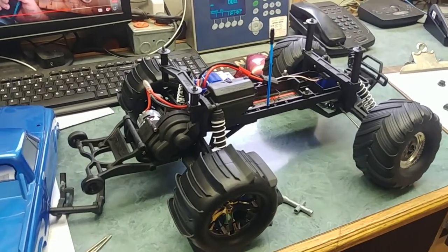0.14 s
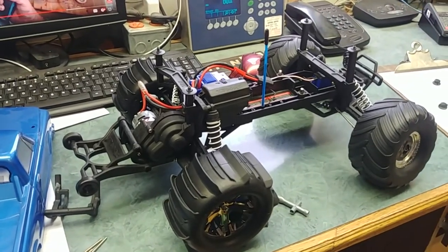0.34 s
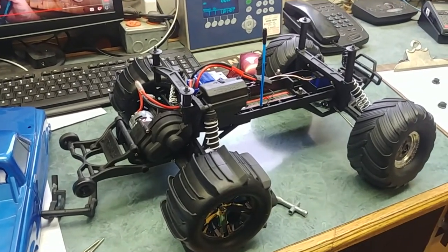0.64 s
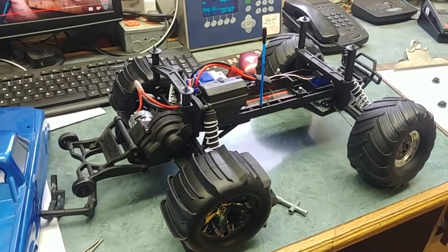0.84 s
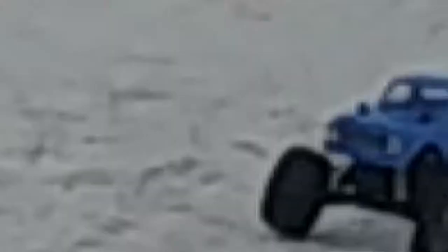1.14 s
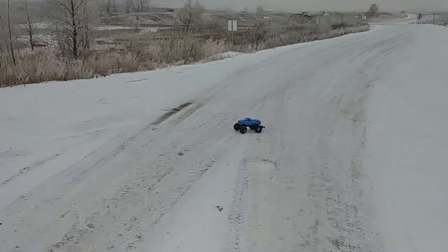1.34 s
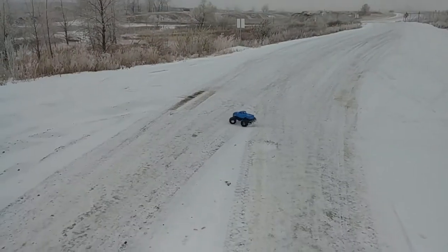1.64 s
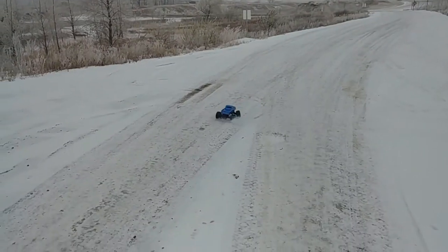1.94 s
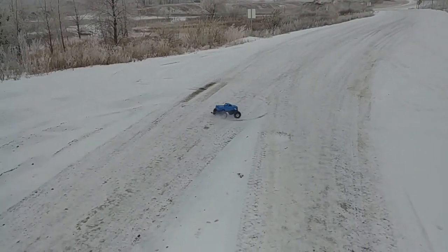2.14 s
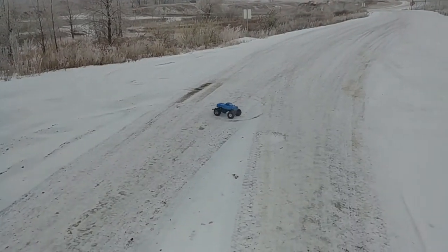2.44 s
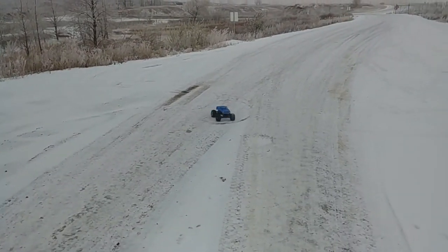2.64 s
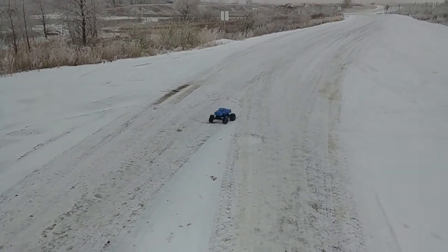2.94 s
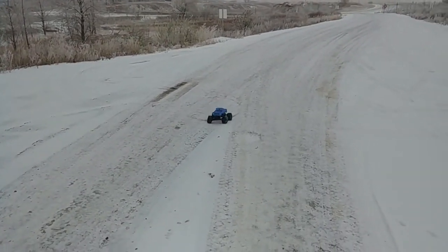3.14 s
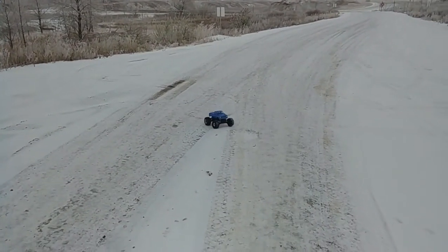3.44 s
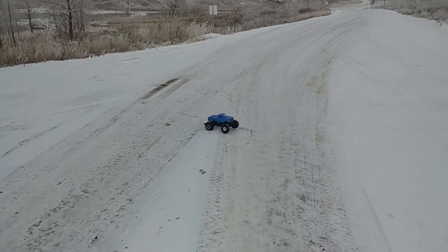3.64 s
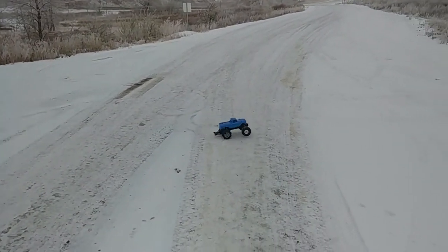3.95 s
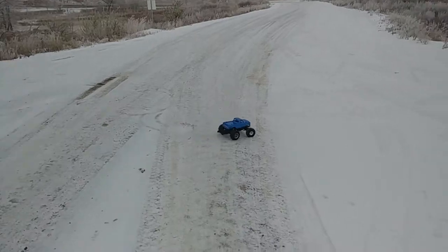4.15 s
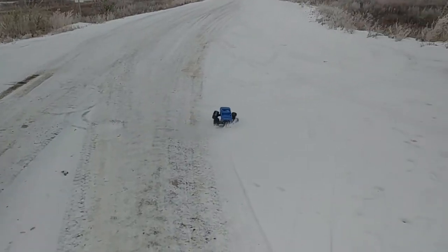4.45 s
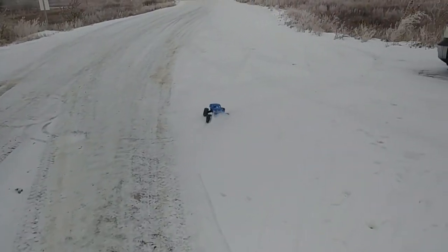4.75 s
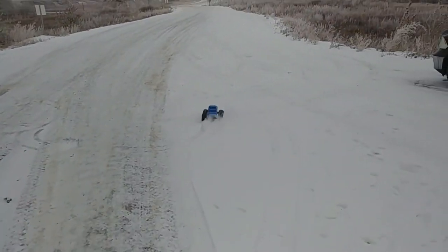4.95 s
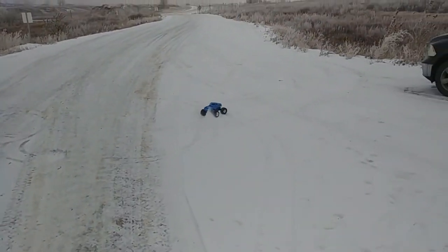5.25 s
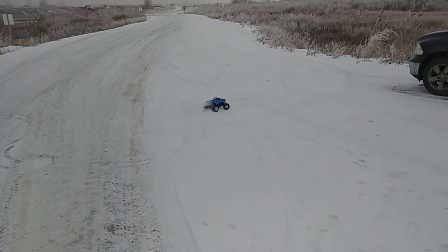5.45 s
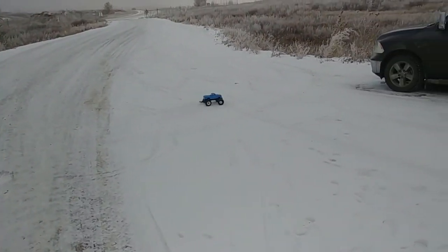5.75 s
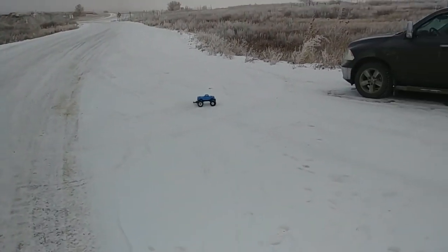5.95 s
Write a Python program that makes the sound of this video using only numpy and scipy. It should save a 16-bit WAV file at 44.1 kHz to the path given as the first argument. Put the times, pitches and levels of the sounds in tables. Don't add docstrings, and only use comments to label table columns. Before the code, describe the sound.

A nearly silent workshop: low room tone, a faint beating appliance hum, small scratchy handling ticks at the start. After a tiny dead silence it cuts outdoors, where a toy truck's electric gears whine up and down in quick throttle bursts, tyres crunching and hissing through snow, clods and grit tapping its plastic shell. Light wind buffets a handheld phone microphone, and a car idles low.

```python
import sys
import numpy as np
from scipy import signal
from scipy.fft import rfft, irfft, next_fast_len
from scipy.io import wavfile

SR = 44100
rng = np.random.default_rng(int(sys.argv[2]) if len(sys.argv) > 2 else 0)


def generate_wav(sig):
    pcm = np.round(np.clip(np.atleast_2d(sig).T, -1, 1) * 32767).astype(np.int16)
    wavfile.write(sys.argv[1], SR, pcm)


def gain_from_decibels(decibels):
    exponent = np.asarray(decibels, float) / 20
    return 10 ** exponent


N = 268172
WORKSHOP_END_S, ROAD_START_S = 0.889, 0.97


def rms_one(x):
    return x / np.sqrt(np.mean(x ** 2) + 1e-20)


def in_time(rows):
    s, *columns = np.transpose(rows)
    return [np.interp(np.arange(N) / SR, s, column) for column in columns]


def at_hz(points, hz):
    table_hz, value = np.transpose(points)
    return np.interp(np.log(hz), np.log(table_hz), value)


def drift(rate):
    step, settle = 20, 4000
    pole = np.exp(-2 * np.pi * rate * step / SR)
    noise = rng.standard_normal(N // step + settle + 2)
    slow = rms_one(signal.lfilter([1], [1, -2 * pole, pole * pole], noise)[settle:])
    return np.interp(np.arange(N) / step, np.arange(len(slow)), slow)


def shaped(x, gain_at):
    size = next_fast_len(N + 4096)
    hz = np.maximum(np.arange(size // 2 + 1) * SR / size, 1)
    return irfft(rfft(x, size) * gain_at(hz), size)[..., :N]


def band(x, low, high):
    return signal.sosfilt(signal.butter(4, [low, high], "band", fs=SR, output="sos"), x)


def bump(at, width):
    return np.exp(-.5 * ((np.arange(N) / SR - at) / width) ** 2)


def spell(start, length, edge_s=0.012):
    t = np.arange(N) / SR
    return np.clip(np.minimum(t - start, start + length - t) / edge_s + .5, 0, 1)


# (frequency [Hz], level [dB])
PORT_SHADOW = [(60, 7.5), (200, 4.5), (380, 10), (700, 5.5), (1290, 4.5), (2380, 9), (4400, 16), (8120, 13),
               (15000, 40.5)]
# (frequency [Hz], coherence [0-1])
COHERENCE = [(100, .9), (500, .97), (1000, .8), (3000, .72), (8000, .62), (15000, .3)]
# (frequency [Hz], delay [samples])
PORT_LAG = [(200, 0.5), (600, 8.7), (1300, 7), (3000, 11.95)]


def ports(direct, diffuse):
    alike = lambda hz: np.clip(at_hz(COHERENCE, hz), 0, 1)
    shadow = lambda hz: gain_from_decibels(-at_hz(PORT_SHADOW, hz))
    late = lambda hz: np.exp(-2j * np.pi * hz * at_hz(PORT_LAG, hz) / SR)
    right = shaped(direct, lambda hz: shadow(hz) * alike(hz) * late(hz))
    right += shaped(diffuse, lambda hz: shadow(hz) * np.sqrt(1 - alike(hz) ** 2))
    return 1.571 * np.array([direct, right])


# (frequency [Hz], level [dB per Hz])
ROOM_TONE = [(30, -14), (69, -14), (171, -16), (193, -33), (239, -4), (270, -23.5), (334, -13),
             (445, -24.5), (770, -28.5), (828, -18.5), (889, -32), (2000, -35.5), (4500, -42),
             (16000, -45.5)]
# (frequency [Hz], level [dB])
APPLIANCE_HUM = [(231, -64), (239, -94), (329, -67.5)]
# (time [s], peak level [dB], centre frequency [Hz], decay [s], relative half width [ratio])
RUSTLE = [
    (0.0008, -39.5, 3400, 0.017, 0.12),
    (0.03, -41, 3500, 0.0022, 0.19),
    (0.047, -42, 2700, 0.0032, 0.29),
    (0.033, -54, 7500, 0.0018, .1),
    (.062, -53, 6500, .002, .35),
    (.043, -45, 3300, .002, .15),
    (.0005, -52, 4600, 0.0095, 0.57),
    (0.36, -70, 5300, 0.013, .3),
    (0.34, -72.5, 5000, 0.0033, .3),
]


def workshop():
    t = np.arange(N) / SR
    room = shaped(rng.standard_normal((2, N)), lambda hz: gain_from_decibels(at_hz(ROOM_TONE, hz)))
    tone = gain_from_decibels(-58 + .5 * drift(23)) * rms_one(room)
    for hz, db in APPLIANCE_HUM:
        tone[0] += gain_from_decibels(db + 3.5 + 2.0 * drift(13.0)) * np.sin(2 * np.pi * hz * t)
    for s, db, hz, decay, half in RUSTLE:
        fading = (t >= s) * np.exp(-np.maximum(t - s, 0) / decay)
        rub = rng.standard_normal((2, N)) * fading
        tone += gain_from_decibels(db + 5.5) * band(rub, (1 - half) * hz, (1 + half) * hz)
    return ports(*tone)


# (time [s], level [dB])
IDLE_LEVEL = [
    (0.97, -51),
    (1.17, -32),
    (1.9, -32),
    (3.25, -34),
    (3.8, -31),
    (4.3, -29.5),
    (4.9, -39),
    (5.1, -35),
    (6.08, -37.5),
]
# (frequency [Hz], level [dB])
ENGINE_ORDERS = [(45.5, -42.5), (91, -5), (136.5, -2), (182, -14), (227.5, -18), (273, -14)]


def idling_car():
    cycle = np.cumsum(1 + 0.00543 * drift(1.94)) / SR
    tones = 0
    for hz, db in ENGINE_ORDERS:
        tones = tones + gain_from_decibels(db + 3.9 * drift(29.0)) * np.sin(2 * np.pi * hz * cycle + 6 * rng.random())
    return gain_from_decibels(in_time(IDLE_LEVEL)[0] + 1.0) * tones


# (frequency [Hz], level [dB per Hz])
OPEN_AIR = [(24, -39), (40, -9), (75, -1), (140, -3.5), (215, -9), (585, -26.5), (1440, -33), (3300, -65),
            (4570, -48), (7930, -49), (8770, -88.5), (13400, -103.5), (16000, -63.5)]


def open_air():
    t = np.arange(N) / SR
    air = shaped(rng.standard_normal((2, N)), lambda hz: gain_from_decibels(at_hz(OPEN_AIR, hz)) * (hz > 150))
    return gain_from_decibels(-45) * rms_one(air) * np.clip((t - ROAD_START_S) / 0.19, .1, 1)


# (time [s], peak level [dB], left minus right [dB])
GUSTS = [(1.21, -27, 10), (1.45, -21.5, 19), (1.841, -25.5, -18), (2.04, -35, 22), (2.6, -40, 4),
         (2.98, -23, -1), (3.3, -26, -6), (3.45, -29.5, -19), (4.04, -26, -17), (4.26, -26, 1),
         (4.49, -43, 13), (4.851, -46, -1), (5.0, -25, -3), (5.4, -30, 24)]


def wind():
    gust_s, breeze_db, breeze_pan_db = 0.034, -30, 0.5
    side = np.array([[.5], [-.5]])
    rise = np.clip((np.arange(N) / SR - ROAD_START_S) / 0.37, .1, 1)
    power = gain_from_decibels(breeze_db + breeze_pan_db * side) ** 2 * rise
    for s, db, pan_db in GUSTS:
        power = power + (gain_from_decibels(db + pan_db * side) * bump(s, gust_s)) ** 2
    lumps = gain_from_decibels(1.9 * np.array([drift(11), drift(37)]))
    turbulence = band(rng.standard_normal((2, N)) * lumps, 55.1, 115.3)
    return gain_from_decibels(-5.5) * np.sqrt(power) * rms_one(turbulence)


# (time [s], tooth mesh frequency [Hz], response time [s], whine level [dB])
TRIGGER = [(0.97, 3957, 0.035, -44.5), (1.275, 1946, 0.095, -47.5), (1.484, 3950, 0.049, -36.5),
           (1.6, 3954, 0.047, -41), (1.745, 3135, 0.042, -38.5), (1.915, 2014, 0.037, -59),
           (2.012, 2350, .02, -43.5), (2.035, 3950, 0.056, -42), (2.13, 3911, 0.047, -52),
           (2.3, 2568, 0.072, -45.5), (2.43, 2132, 0.016, -43), (2.487, 1860, 0.014, -60.5),
           (2.62, 2162, 0.043, -66), (2.7, 1655, 0.0091, -47.5), (2.76, 1184, 0.038, -45.5),
           (2.985, 1100, 0.033, -53), (3.205, 5020, 0.19, -43), (3.345, 3233, .03, -40.5),
           (3.42, 3580, 0.023, -32), (3.455, 3076, 0.047, -38.5), (3.525, 1706, 0.06, -48),
           (3.575, 1802, .07, -43), (3.7, 2013, .025, -59), (3.74, 2050, 0.025, -55),
           (3.757, 4587, 0.22, -39), (3.885, 3265, 0.027, -39.5), (3.915, 2660, 0.013, -37.5),
           (3.95, 2928, 0.028, -39.5), (4.07, 3390, 0.02, -46), (4.3, 3192, .03, -36.5),
           (4.37, 2800, 0.02, -32.5), (4.405, 2860, 0.017, -42), (4.475, 2003, 0.096, -49.5),
           (4.625, 1577, 0.015, -59), (4.73, 3102, 0.032, -36.5), (4.885, 3260, 0.012, -38),
           (5.025, 2770, .04, -40), (5.225, 2540, 0.028, -42.5), (5.39, 2325, 0.033, -43),
           (5.475, 2077, 0.017, -53.5), (5.51, 2065, .03, -58.5), (5.6, 1743, 0.021, -58.5),
           (5.66, 1651, 0.068, -74), (5.8, 1615, 0.024, -66.5), (5.99, 1507, 0.026, -67.5)]


def throttle():
    whine_settle_s = 0.012
    t = np.arange(N) / SR
    hz, db = np.full(N, float(TRIGGER[0][1])), np.full(N, float(TRIGGER[0][3]))
    for s, goal_hz, response, goal_db in TRIGGER:
        at = round(s * SR)
        hz[at:] = goal_hz + (hz[at] - goal_hz) * np.exp(-(t[at:] - s) / response)
        db[at:] = goal_db + (db[at] - goal_db) * np.exp(-(t[at:] - s) / whine_settle_s)
    return hz, db


# (start [s], length [s], loss [dB], overspeed [Hz])
SLACK = [(0.96, 0.0567, 18, 50.4), (1.05, .045, 14, 60), (1.116, .025, 6, 61.1), (1.256, 0.02603, 13, 150),
         (1.32, .04, 6, 0.43), (1.398, 0.079, 19, 0.88), (1.531, 0.02, 12, 0.45), (1.562, 0.071, 9.5, 2.2),
         (1.719, 0.011, 8, 40.8), (1.732, 0.019, 5, 1), (1.799, 0.05, 9, 220), (1.898, 0.04, 12, 2),
         (2.11, 0.071, -1, 1.3), (2.322, 0.092, 6, 1.1), (2.545, 0.049, 14, 0.91), (2.682, 0.02, 21, 0.89),
         (2.731, 0.04556, 6, 80), (2.843, 0.01457, 1, 200), (2.897, .012, -1, 150),
         (2.943, 0.01962, 6, 170), (3.058, 0.1086, 15.5, 60), (3.219, 0.068, 10.5, 0.84),
         (3.314, 0.025, 2, 0.79), (3.407, .045, 12, 0.88), (3.514, 0.083, 11, 0.68),
         (3.62, 0.091, 21.5, 1.4), (3.828, 0.045, 8, 55), (3.917, 0.014, 5, 1.1), (4.05, 0.031, 31, 1.7),
         (4.163, 0.18, 6, 1.4), (4.32, .042, 12, 1), (4.469, 0.0907, -1, 49.7), (4.609, 0.018, 4, 1.1),
         (4.727, 0.053, 5, 1.2), (4.795, 0.04, 6, 1.3), (4.84, 0.02, 8, 1.1), (4.954, 0.015, 6, 0.79),
         (5.088, 0.0257, 5, 220), (5.149, 0.08, 8, 180), (5.261, 0.036, 6, 39), (5.315, 0.04, 1, 60),
         (5.433, .035, 14, 180), (5.501, .04, 7, 85), (5.565, .03, 10, 70), (5.638, 0.028, 23, 220),
         (5.761, 0.027, 0, 40), (5.838, .15, 23, 110), (6.035, 0.062, 9, 0.97)]


def backlash(hz, db):
    edge_s, overspeed_s = 0.011, 0.034
    t = np.arange(N) / SR
    for s, length, loss_db, extra_hz in SLACK:
        since = t - s - length
        db = db - loss_db * spell(s, length, edge_s)
        speeding = np.clip(1 + since / length, 0, 1)
        sagging = np.exp(-np.abs(since) / overspeed_s)
        hz = hz + extra_hz * np.where(since < 0, speeding, sagging)
    return hz, db


# (time [s], second harmonic over first [dB])
FACING = [(.97, -21), (1.5, -29), (1.585, -9), (1.63, -4), (1.72, -9), (1.76, -3), (1.82, -13), (1.87, -18),
          (1.895, 3.5), (1.925, -15), (2.0, -13), (2.04, 9), (2.065, -13), (2.13, -7), (2.17, 5),
          (2.3, 5.5), (2.42, -47), (2.48, -30), (2.51, 12), (2.73, 8), (2.76, -8), (2.8, -1), (2.83, 0),
          (2.87, -21), (3.15, -17), (3.21, -10), (3.235, 14), (3.28, 4.5), (3.305, -24), (3.38, -8),
          (3.45, -33), (3.51, -6), (3.56, 10), (3.61, -5.5), (3.69, 15.5), (3.74, 19), (3.775, -10),
          (3.9, -35), (4.25, -3), (4.35, -5), (4.4, -20), (4.47, -11.5), (4.5, -24), (4.58, -11),
          (4.62, -11), (4.645, 15), (4.725, 20.5), (4.76, -10), (4.8, -22), (4.82, -5.5), (5.05, -17.5),
          (5.33, -23), (5.41, -7), (5.45, -26), (5.48, -7), (5.6, 6.5), (6.08, 26)]


def second_harmonic(mesh_db, glide_hz):
    loss_db = 10
    glide = np.clip(abs(np.gradient(glide_hz)) * SR / 20000, 0, 1)
    return mesh_db + in_time(FACING)[0] - loss_db * glide


# (frequency [Hz], width [Hz])
SHELL = [(446, 586), (1054, 95), (1831, 110), (2250, 400), (3290, 31), (6250, 870), (7730, 47), (8040, 930)]


def shell_lift(hz):
    return sum(1 / (1 + (2 * (hz - mid) / width) ** 2) for mid, width in SHELL)


TEETH = 25
# (time [s], gain [dB])
FLARES = [(1.64, 19), (2.085, 14.5), (2.98, 11), (3.6, 17), (4.49, 23.5), (4.81, 15), (4.87, 11.5),
          (4.93, 8.5), (4.98, 4), (5.04, 9), (5.17, 12), (5.23, 9), (5.28, 14)]


def gears(turns, hz, mesh_db, second_db):
    wobble = np.cumsum(hz * (.005 * drift(80) + .007 * drift(16))) / SR
    phase = 2 * np.pi * (TEETH * turns + wobble)
    runout = np.sin(2 * np.pi * turns) + .35 * np.sin(6 * np.pi * turns + 1)
    third_db = mesh_db - 6.5 - hz / 170
    third_db = third_db + sum(db * bump(s, 0.032) for s, db in FLARES)
    beat = 1 + 0.057 * np.sin(2 * np.pi * turns + 2.6)
    out = 0
    for k, db in enumerate((mesh_db + 8.5, second_db + 8.5, third_db), 1):
        rattle = rms_one(band(rng.standard_normal(N), 51, 450))
        level = gain_from_decibels(db + 4.2 * np.clip(drift(38), -3, 1))
        out = out + level * (.95 + .5 * rattle / k ** .7) * np.sin(k * phase + .6 * runout)
    return shaped(beat * out, lambda hz: .6 + .5 * shell_lift(hz))


# (time [s], level [dB])
GRIP = [(0.98, -40.5), (1.19, -29), (1.46, -36), (1.58, -27), (2.37, -28.5), (2.43, -32.5), (2.97, -33.5),
        (3.18, -55), (3.25, -30.5), (3.41, -29), (3.72, -42), (3.82, -34), (4.39, -30.5), (4.59, -45),
        (4.96, -50), (5.01, -34.5), (5.18, -50), (6.08, -55)]
# (time [s], level [dB])
EFFORT = [(0.98, -60), (1.05, -49.5), (1.29, -47), (1.45, -60), (1.63, -47.5), (1.92, -38.5), (1.96, -50),
          (2.29, -39.5), (2.36, -53.5), (3.22, -67), (3.35, -46.5), (3.76, -54.5), (4.32, -43.5),
          (4.74, -51), (4.83, -43.5), (5.27, -50), (5.43, -61), (6.08, -65.5)]


def driven(db, grip, effort):
    mean_grip_db, mean_effort_db = -35, -55
    grip_db = grip * (in_time(GRIP)[0] - mean_grip_db)
    return db + grip_db + effort * (in_time(EFFORT)[0] - mean_effort_db)


def shaft(turns, hz):
    level_db = driven(-39, grip=0.87, effort=0.47) + 3 * np.log2(hz / 3500)
    return gain_from_decibels(level_db) * np.sin(2 * np.pi * turns)


# (frequency [Hz], level [dB per Hz])
TRUCK = [(120, -37.5), (200, -3), (360, -10.5), (440, -5), (735, -11), (1040, -13.5), (1590, -18),
         (2250, -21), (3900, -27.5), (5330, -35), (6200, -32), (7830, -29.5), (9000, -33), (10500, -51),
         (13000, -64.5)]


def shell_gain(hz):
    bounce = 1 + .3 * np.cos(2 * np.pi * hz * .0023)
    return bounce * gain_from_decibels(at_hz(TRUCK, hz)) * (0.6 + 1.72 * shell_lift(hz))


def grains(per_s, spread_db):
    born = rng.random(N) < per_s / SR
    size = gain_from_decibels(spread_db * np.minimum(rng.exponential(1, N), 2)) * born
    burst = signal.lfilter([1], [1, -.97], size)
    return rng.standard_normal((2, N)) * (1.27 + burst)


# (start [s], length [s], loss [dB])
WHEELSPIN = [
    (3.054, 0.11, 5.5),
    (4.85, 0.14, 13),
    (4.948, 0.285, 16),
]
# (time [s], gain [dB])
SPURTS = [
    (1.511, 0),
    (1.889, 3.5),
    (1.99, 12),
    (2.081, 9.5),
    (2.36, 7.5),
    (2.71, 7.5),
    (3.49, -1),
    (4.15, 6.5),
    (4.33, 9),
]


def churn(turns, hz):
    free_db = sum(db * spell(s, length) for s, length, db in WHEELSPIN)
    spurt_db = sum(db * bump(s, 0.026) for s, db in SPURTS)
    drum_db = driven(-35.4, grip=1.29, effort=0.013) - 0.15 * free_db
    churn_db = driven(-42, grip=0.67, effort=0.24) - free_db + 0.6 * spurt_db
    gearbox_db = driven(-48, grip=0.12, effort=0.58) + spurt_db
    brush_db = driven(-60.5, grip=.01, effort=1)
    snow = shaped(grains(.15 * hz, 3.2) * gain_from_decibels(0.5 * drift(18)), shell_gain)
    pulse = .5 + .5 * np.sin(2 * np.pi * turns + .8 * drift(30))
    puff = (.5 + pulse ** 2) * gain_from_decibels(1.8 * drift(15))
    hiss = shaped(rng.standard_normal((2, N)) * puff + .5 * grains(1.0 * hz, 0.74), shell_gain)
    out = gain_from_decibels(drum_db) * rms_one(band(snow, 190, 800))
    out += gain_from_decibels(churn_db + 1.16 * drift(38.0)) * rms_one(band(snow, 1075, 3100))
    out += gain_from_decibels(gearbox_db + 2.15 * drift(18.0)) * rms_one(band(hiss, 2614, 5284))
    out += gain_from_decibels(brush_db + 2.0 * drift(17)) * rms_one(band(hiss, 5880, 11000))
    return out


# (start [s], length [s], level [dB])
SPELLS = [(0.979, 0.366, -61.5), (1.514, 0.12, -60), (1.586, 0.18, -47), (1.757, 0.186, -54),
          (2.047, 0.31, -60.5), (2.36, 0.165, -72), (3.201, .15, -70), (3.438, 0.042, -61),
          (3.702, 0.34, -67), (3.996, 0.38, -54.5), (4.363, 0.23, -60), (4.747, 0.35, -61),
          (5.198, 0.18, -66), (5.405, 0.22, -76), (5.633, 0.5, -81.5)]


def sizzle():
    bright = shaped(rng.standard_normal((2, N)), lambda hz: np.clip(hz / 15500, 0, 1) ** 8)
    level = sum(gain_from_decibels(db) * spell(s, length) for s, length, db in SPELLS)
    return level * gain_from_decibels(12.0 + 2.4 * drift(24)) * rms_one(bright)


# (time [s], level [dB])
GRIT = [
    (1.023, -22),
    (1.684, -24),
    (1.903, -8.5),
    (1.908, -16),
    (3.18, -47),
    (4.03, -19),
    (4.326, -24),
]


def grit():
    clicks = np.zeros(N)
    for s, db in GRIT:
        clicks[round(s * SR)] += gain_from_decibels(db)
        clicks[round((s + .0011) * SR)] -= gain_from_decibels(db - 18.0)
    return band(clicks + 1e-18, 1250, 15000)


# (time [s], splat peak level [dB], thud level [dB])
SPRAY = [(1.0238, -25, -22.5), (1.1294, -44, -14), (1.6819, -11, -12), (1.901, -14, -50), (1.97, -23, -33),
         (3.1882, -46, -49), (3.2494, -27.5, -49), (4.0298, -19.5, -51), (4.135, -18, -16),
         (4.2471, -26, -13), (4.373, -32, -22), (5.0178, -27, -38)]


def clods():
    out = np.zeros(N)
    t = np.arange(1800) / SR
    for s, db, thud_db in SPRAY:
        noise, at = rng.standard_normal(len(t)), round(s * SR)
        splat = band(noise * np.exp(-t / 0.0051), 1300, 17000)
        thud = band(noise * np.exp(-t / 0.025), 200, 1040)
        out[at:at + len(t)] += gain_from_decibels(db - 23.5) * splat + gain_from_decibels(thud_db + 2.0) * thud
    return out


def truck():
    bank_echo_s, bank_echo = .021, .4
    glide_hz, mesh_db = throttle()
    hz, mesh_db = backlash(glide_hz, mesh_db)
    turns = np.cumsum(hz / TEETH) / SR
    whine = gears(turns, hz, mesh_db, second_harmonic(mesh_db, glide_hz))
    whine = whine + bank_echo * np.roll(whine, round(bank_echo_s * SR))
    out = churn(turns, hz) + sizzle()
    out[0] += whine + shaft(turns, hz) + grit() + clods()
    out[1] += np.roll(whine, 157)
    return out


# (time [s], left over right [dB])
TURNING = [(0, 1), (.45, -1), (.6, 0.5), (1.1, 2), (1.6, 0.5), (2.3, 1), (2.7, -0.5), (3.6, 0), (4.2, 0.5),
           (5.2, 1), (6.08, 2.5)]


def scene():
    t = np.arange(N) / SR
    road = truck() + open_air()
    road[0] += idling_car()
    heard = workshop() * (t < WORKSHOP_END_S)
    heard = heard + (ports(*road) + wind()) * (t >= ROAD_START_S)
    return heard * gain_from_decibels(in_time(TURNING)[0] * np.array([[.2], [-.8]]))


# (frequency [Hz], depth [dB])
MASKING_DEPTH = [(600, 10), (900, 8), (1500, 9), (2100, 10), (3000, 30), (4500, 18), (5300, 9.5),
                 (6400, 13), (7500, 23.5), (8600, 11), (9500, 12), (12000, 7.5), (15500, 16)]
# (start [s], length [s], low frequency [Hz], high frequency [Hz])
STARVED = [
    (1.6, .09, 5100, 6500),
    (4.605, .05, 5000, 5600),
    (4.81, .065, 4500, 5600),
    (5.195, .04, 5000, 5600),
    (5.185, .06, 1550, 1950),
    (4.85, .055, 1600, 2100),
]


def masking_gate(x):
    hz, t, spec = signal.stft(x, SR, "cosine", 2048, 1024)
    edges = np.r_[np.geomspace(28, 380, 22), np.arange(412, 740, 32), 738]
    edges = np.round(edges).astype(int)
    width = np.diff(edges)
    power = np.add.reduceat(abs(spec) ** 2, edges, axis=1)[:, :-1] / width[:, None]
    level_db = 10 * np.log10(power + 1e-20)
    treble = power[:, 15:24].mean(axis=1, keepdims=True)
    treble_db = 10 * np.log10(treble + 1e-20)
    kept = level_db > treble_db - at_hz(MASKING_DEPTH, hz[edges[:-1]])[:, None]
    centre = (hz[edges[:-1]] + hz[edges[1:]]) / 2
    for s, length, low, high in STARVED:
        inside = (centre >= low) & (centre <= high)
        kept &= ~(inside[:, None] & (t >= s) & (t <= s + length))
    kept &= kept[:1]
    indoors = t < WORKSHOP_END_S
    hiss_db = np.median(level_db[:, 17:18, indoors], axis=2, keepdims=True)
    kept[..., indoors] &= level_db[..., indoors] > hiss_db + .3
    spec[:, edges[0]:edges[-1]] *= np.repeat(kept, width, axis=1)
    spec[:, edges[-1]:] = 0
    return signal.istft(spec, SR, "cosine", 2048, 1024)[1][:, :N]


def band_limit(x):
    return signal.sosfilt(signal.butter(12, 16580, fs=SR, output="sos"), x)


def record(dry):
    t = np.arange(N) / SR
    mix = masking_gate(dry) * ((t < WORKSHOP_END_S) | (t >= ROAD_START_S))
    return band_limit(mix)


dry = scene()
out = record(dry)
generate_wav(out)
```